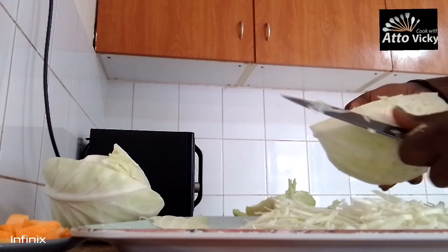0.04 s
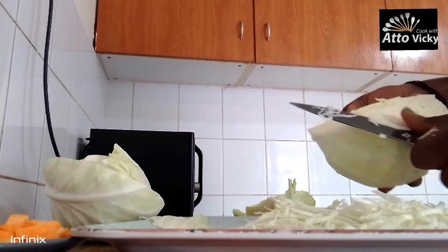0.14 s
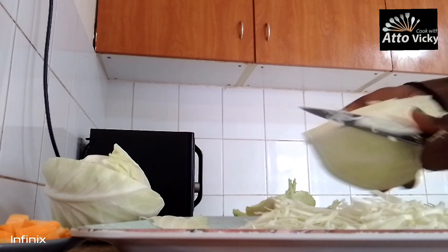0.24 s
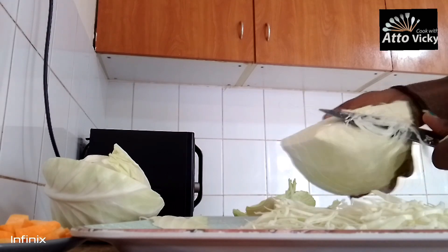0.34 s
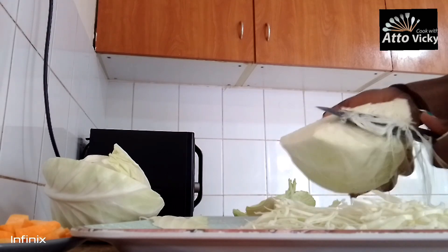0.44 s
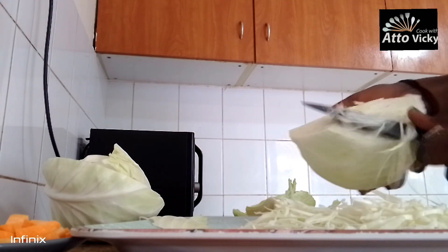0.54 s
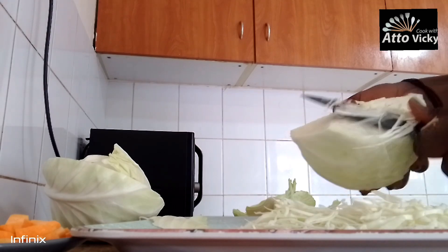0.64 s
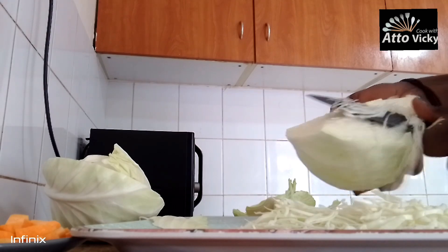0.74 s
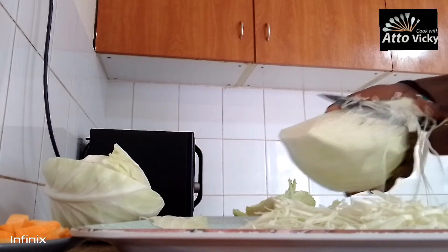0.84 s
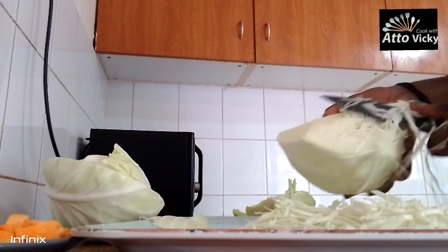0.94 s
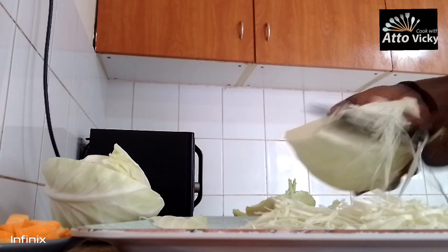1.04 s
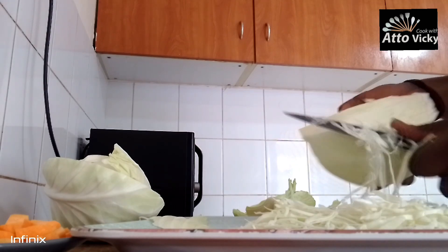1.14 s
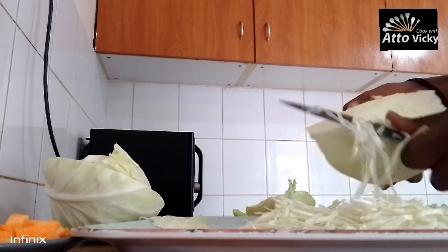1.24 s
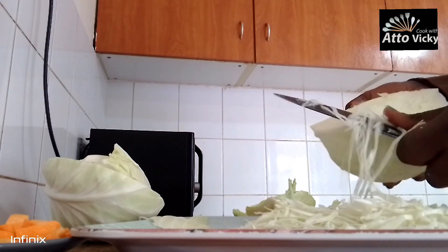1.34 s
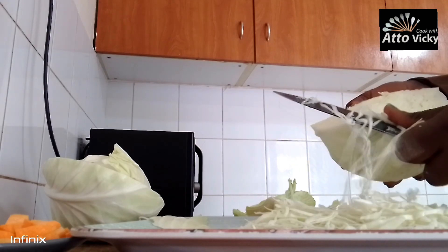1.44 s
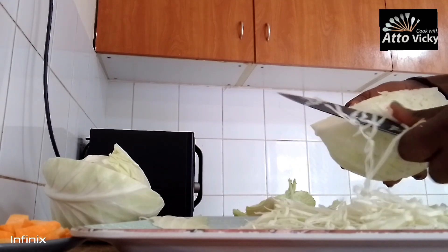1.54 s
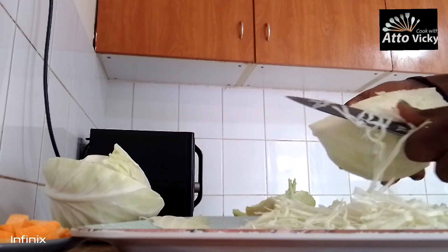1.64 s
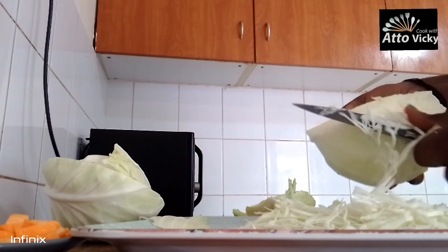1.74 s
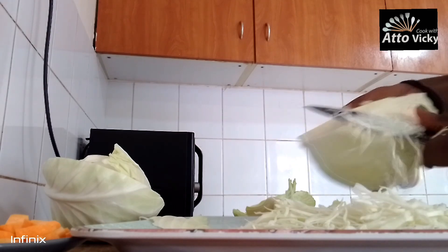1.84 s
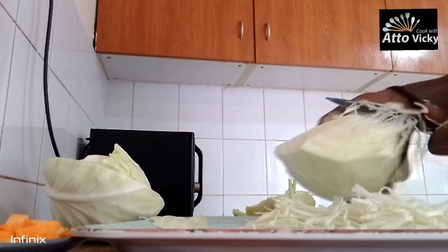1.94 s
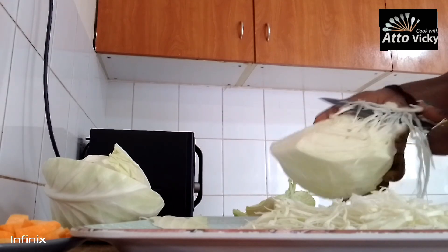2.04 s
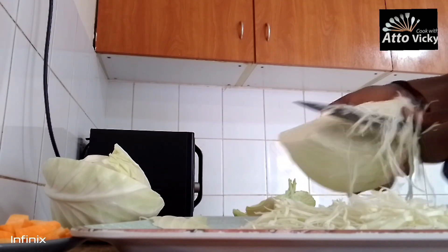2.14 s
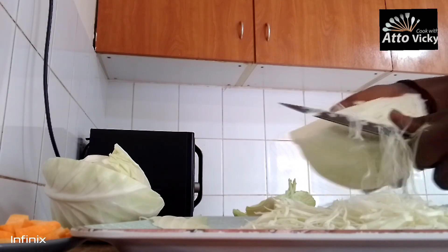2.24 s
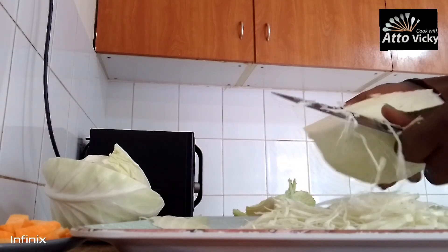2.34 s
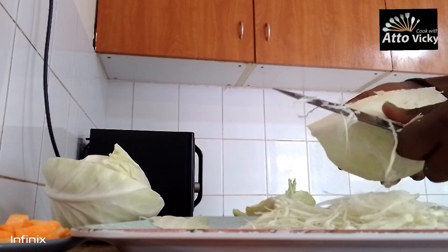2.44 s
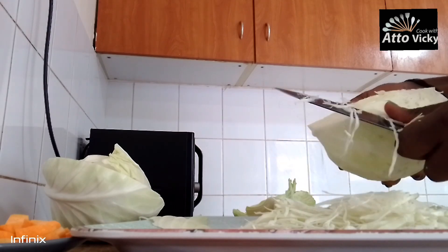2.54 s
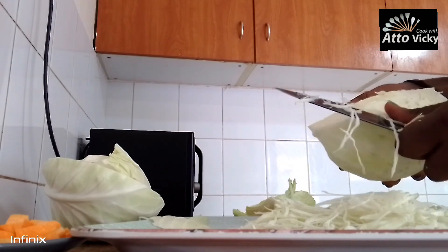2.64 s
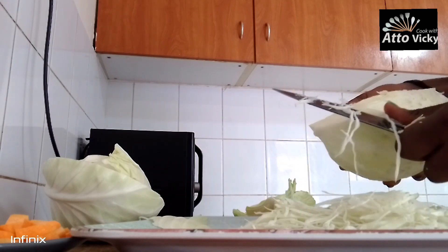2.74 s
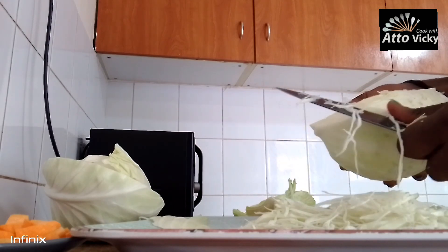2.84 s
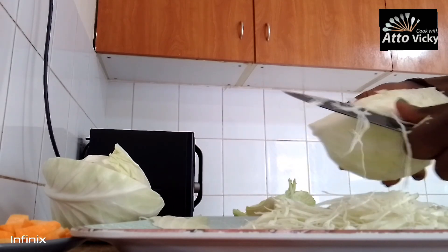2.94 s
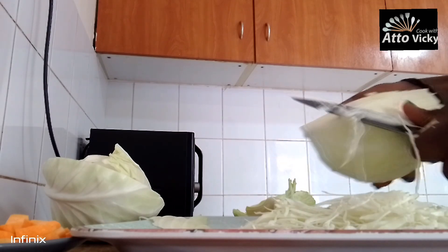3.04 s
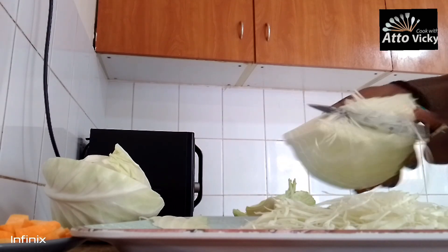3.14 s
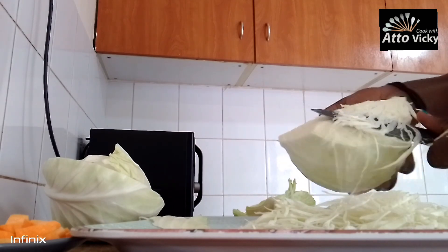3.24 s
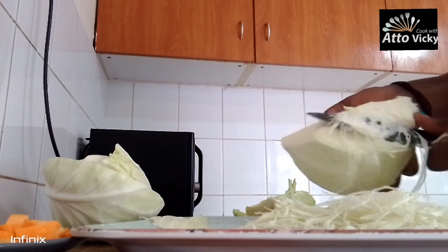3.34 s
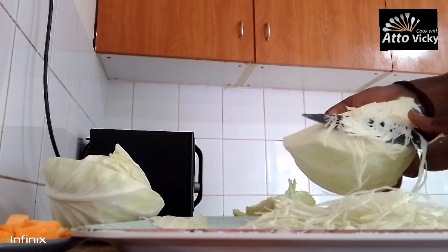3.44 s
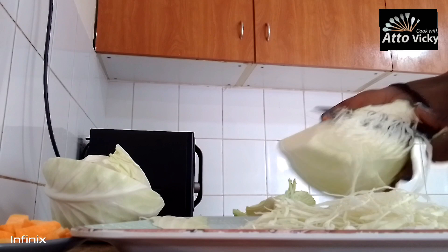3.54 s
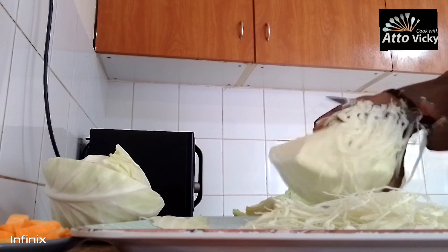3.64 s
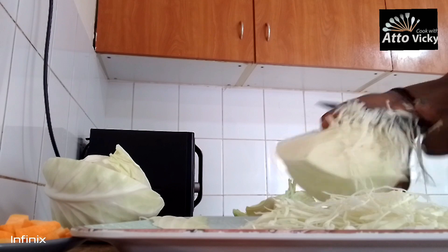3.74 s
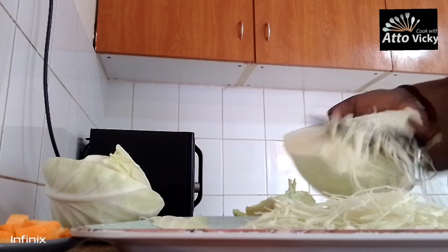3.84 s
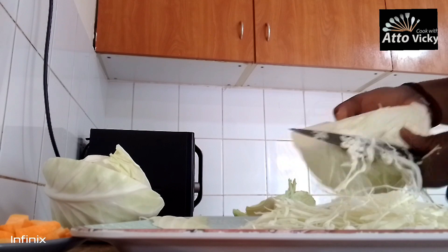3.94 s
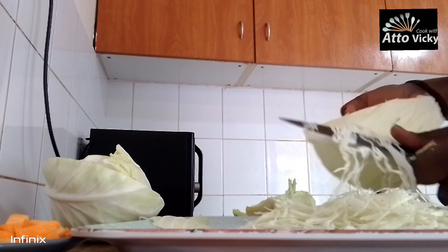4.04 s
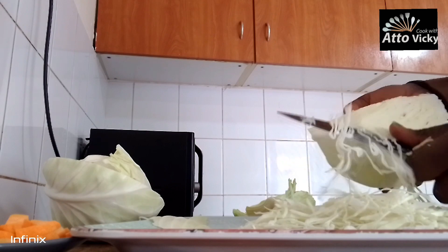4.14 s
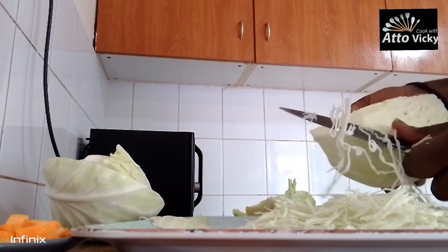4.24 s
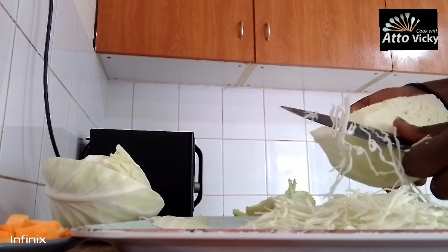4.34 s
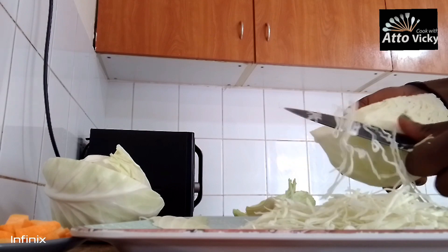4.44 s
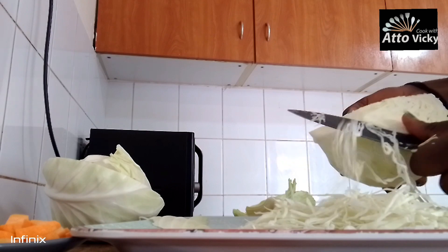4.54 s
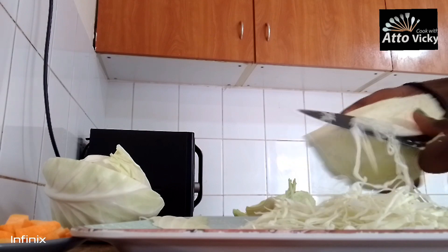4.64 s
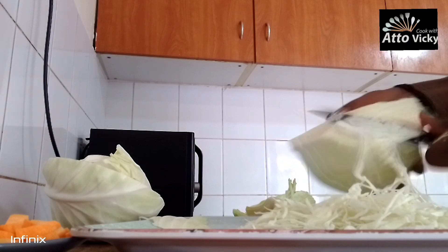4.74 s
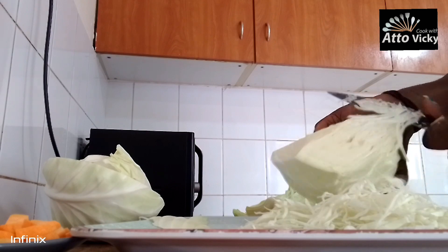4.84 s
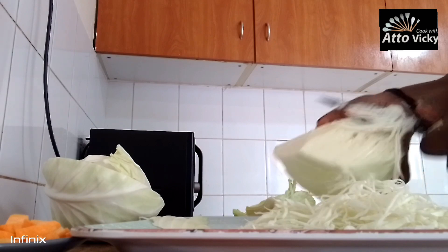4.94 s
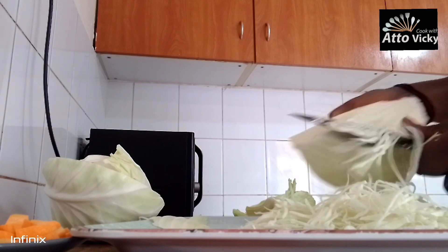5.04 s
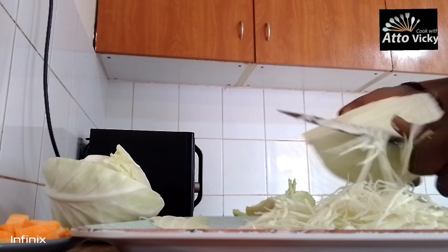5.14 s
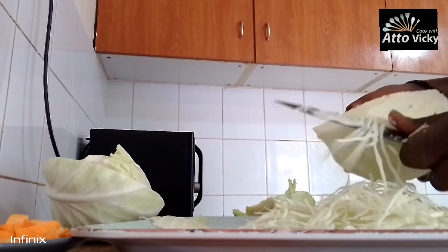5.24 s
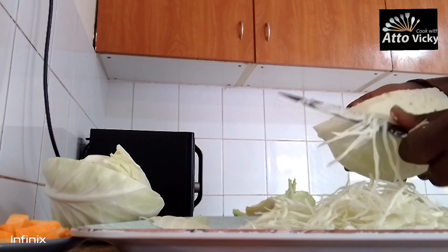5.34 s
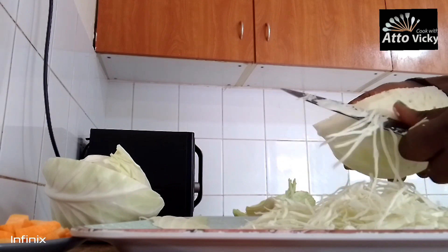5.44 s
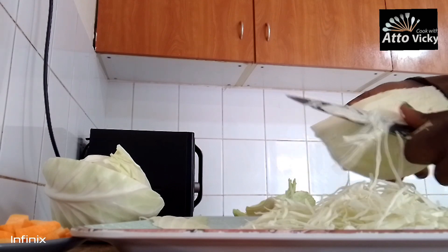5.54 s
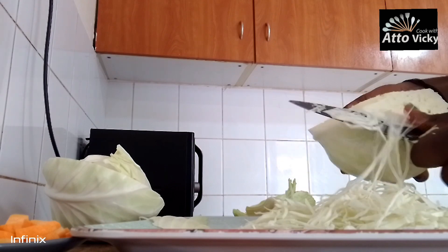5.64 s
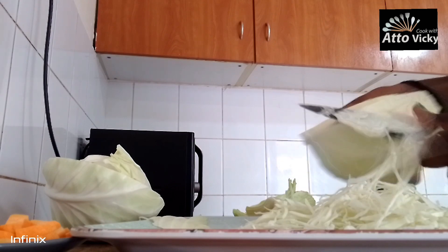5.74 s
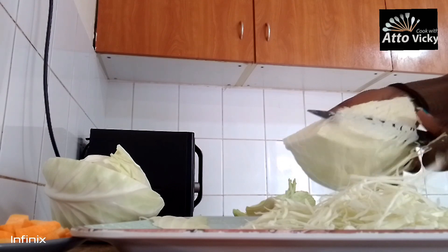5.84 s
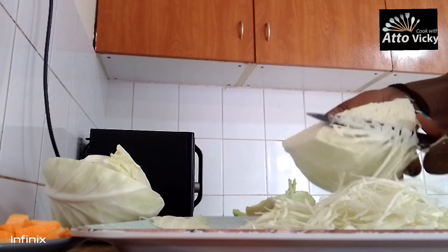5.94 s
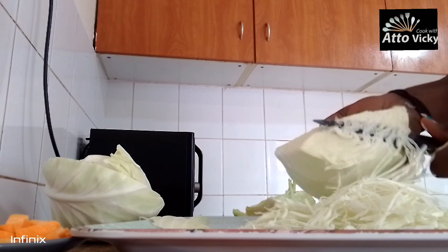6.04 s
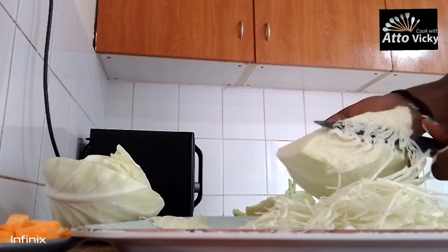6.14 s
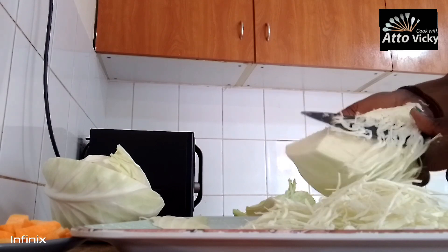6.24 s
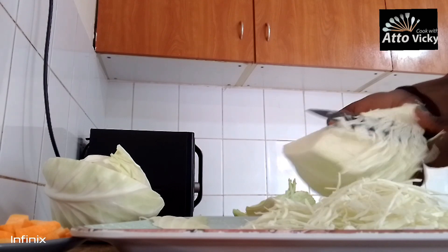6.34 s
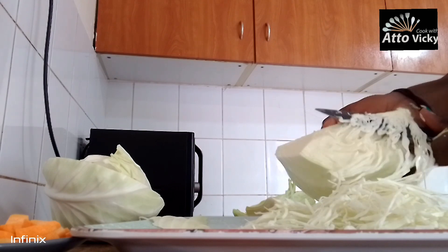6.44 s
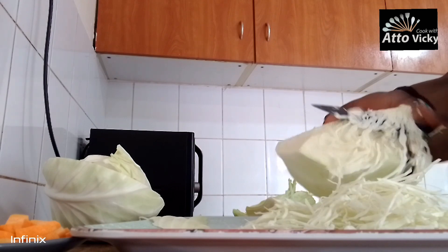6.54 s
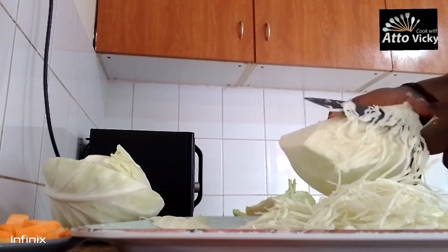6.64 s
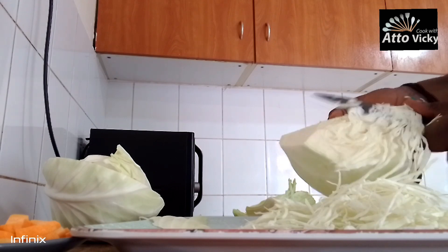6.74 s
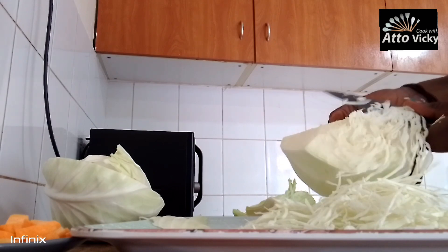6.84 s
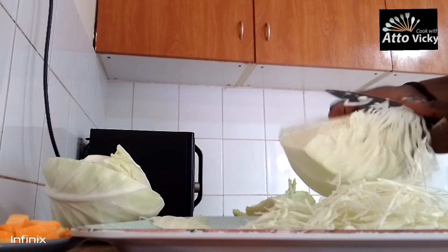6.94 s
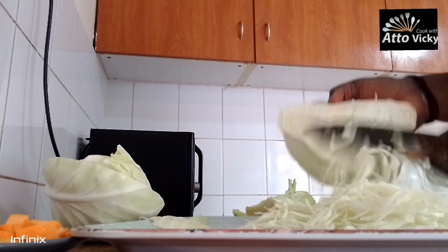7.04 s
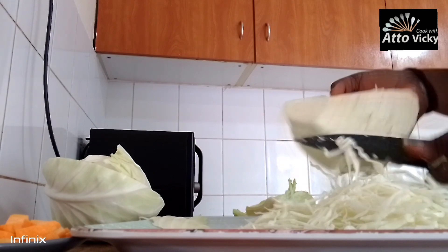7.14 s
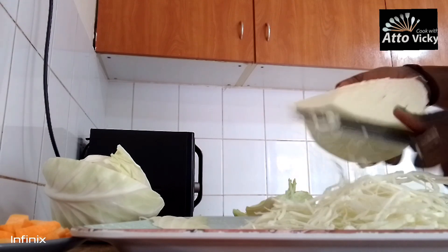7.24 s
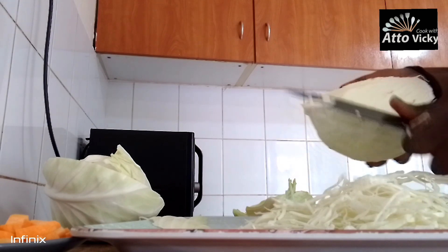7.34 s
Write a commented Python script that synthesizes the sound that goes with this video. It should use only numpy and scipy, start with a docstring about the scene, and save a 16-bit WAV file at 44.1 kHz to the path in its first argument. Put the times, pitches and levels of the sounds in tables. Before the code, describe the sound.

Raw cabbage is shredded by hand close to the microphone: brief tearing crunches with high sizzling edge noise and a slight hollow body. Early cuts are moderate, middle ones louder and more widely spaced, then a quick run of short cuts comes after about five and a half seconds. Tiny hard cracks, occasional wet squeaks and very soft pattering shreds add detail. A quiet appliance hum and a tiled room's short reverberation surround it.

```python
"""Tiled kitchen: a knife shreds a raw cabbage held in the hand.
Strokes are filtered random bursts: crisp cells, tearing fibres, edge fizz and the head's hollow body.
Ribs snap and shreds patter as decaying noise cracks; wet leaves squeak as narrow noise.
A soft hollow tone, also narrow noise, comes and goes. An appliance hums in sines over room noise.
Decaying noise and early reflections give the kitchen's echo."""
import sys
import numpy as np
from scipy import signal
from scipy.fft import rfft, irfft, next_fast_len
from scipy.io import wavfile
from scipy.ndimage import uniform_filter1d, map_coordinates

SR = 44100
rng = np.random.default_rng(int(sys.argv[2]) if len(sys.argv) > 2 else 0)


def pcm_store(signal):
    """Save signal as 16-bit PCM."""
    levels = np.round(np.clip(np.atleast_2d(signal), -1, 1) * 32767)
    wavfile.write(sys.argv[1], SR, levels.astype(np.int16).T)


N = 325458

# Appliance hum. Each row: frequency in Hz, rms level in dB before HUM_TRIM_DB.
HUM_PARTIALS = [(290.7, -77.5), (366.1, -85.5), (468.3, -87.5), (769.8, -99.5), (920.5, -89)]
# Room noise colour. Each row: frequency in Hz, relative density in dB per Hz.
AIR_COLOUR = [(25, -22), (120, -20.5), (160, -21.5), (200, -15), (245, 0), (330, -4.5), (650, -7),
              (900, -8), (1100, -12), (1800, -17), (2600, -22), (4500, -18.5), (8600, -14), (11500, -19.5),
              (15000, -16)]
HUM_TRIM_DB, AIR_RMS_DB = 2.0, -69.5

# Blade strokes, light grazes to full cuts. Each row: start in seconds, length in seconds,
# swell from entry to crest in dB (scaled per layer), then levels before layer trim of crunch in dB,
# tough fibres in dB, hollow body in dB, fine fizz in dB; body resonance at entry in Hz, at the end in Hz.
STROKES = [ (0.097, 0.091, 8, -50.5, -67.5, -68.5, -56.5, 720, 780),
           (0.296, 0.160, 13, -37, -51, -54.5, -48.5, 860, 740.5),
           (0.753, 0.076, 1, -58.5, -70, -65, -58.5, 560, 560),
           (0.847, 0.13, 14.5, -40.5, -55, -64, -55, 880, 990),
           (1.661, 0.16, 3, -49, -67.5, -61, -56.5, 720, 960),
           (1.887, 0.165, 11, -35, -46.5, -46.5, -44.5, 960, 523.5),
           (2.983, 0.028, 11, -59, -72, -69, -61.5, 650, 650),
           (3.055, 0.24, 18, -32.5, -48, -56, -50, 400, 682),
           (3.470, 0.046, 13, -58.5, -76, -71, -68, 520, 520.5),
           (3.62, 0.098, 16.5, -29.5, -45.5, -50, -47, 920, 924),
           (4.497, 0.034, 0, -61.5, -76, -75, -66, 800, 800),
           (4.557, 0.033, -2, -51, -67.5, -69, -55.5, 900, 860),
           (4.713, 0.14, 10, -29, -44.5, -43.5, -40, 740, 771),
           (5.594, 0.080, 3, -46, -65.5, -62.5, -55.5, 870, 900),
           (5.782, 0.15, 2, -32, -46.5, -49, -41.5, 680, 620.7),
           (6.068, 0.077, 7.5, -34, -52.5, -52, -51.5, 650, 680),
           (6.303, 0.0262, 10, -54.5, -68, -69, -60, 780, 830),
           (6.415, 0.089, 22, -31.5, -48.5, -54, -47.5, 1000, 1028),
           (6.650, 0.064, 9, -50.5, -73, -64, -62, 685, 685),
           (6.800, 0.018, -2, -51, -72, -71, -57, 685, 686.4),
           (6.82, 0.061, 6.5, -35.5, -52.5, -60.5, -48.5, 685, 681.5),
           (6.924, 0.099, 4, -47.5, -70.5, -69.5, -64, 680, 680),
           (7.205, 0.12, -3, -67.5, -74, -81, -86, 650, 540), ]
# Cut colours. Each row: frequency in Hz, relative density in dB per Hz.
CRUNCH_COLOUR = [(700, -44), (1500, -23), (2400, -33.5), (3800, -26), (5200, -12.5), (6500, -9.5),
                 (7800, 1), (8900, 3), (9900, -2.5), (11000, -9), (12500, -21.5), (16000, -33.5)]
FIBRE_COLOUR = [(900, -31), (1700, -6), (2600, 0.5), (3600, 1), (5200, 4), (7000, 1), (10000, -20)]
BODY_COLOUR = [(30, -15), (150, -58), (240, -19.5), (360, -7.5), (480, 0), (720, -0.5), (1250, 0),
               (1600, -14), (2500, -19.5), (4000, -12.5), (7000, -44)]
FIZZ_COLOUR = [(1200, -33.5), (2200, -14), (4000, -7), (7000, 0.5), (11000, 4), (12500, 4), (15700, 1)]
# How each layer follows a stroke. Entries: crest as a share of the length, share of the stroke's swell,
# swell of its own in dB, drop from crest to end in dB, fade after the end in dB/s.
CRUNCH_SHAPE = (0.7, 0.9, 1.2, 3.5, 270)
FIBRE_SHAPE = (0.92, 0.98, 6.7, 3.6, 320)
BODY_SHAPE = (0.79, 0.67, 5.8, 1.9, 185)
FIZZ_SHAPE = (0.51, 0.46, 0.87, 3.9, 480)
CRUNCH_TRIM_DB, FIBRE_TRIM_DB, BODY_TRIM_DB, FIZZ_TRIM_DB = -3.0, -2.5, -2.0, 2.3
BITE_S = 0.011  # rise as the edge enters, ending at the stroke's start

# Kitchen decay. Each row: frequency in Hz, time to fall 60 dB in seconds.
KITCHEN_DECAY = [(200, 0.93), (800, 0.58), (3000, 0.48), (8500, 0.37), (15000, 0.46)]
# Single ribs snapping. Each row: time in seconds, dry peak in dB.
RIB_SNAPS = [(0.3077, -35), (0.4205, -30), (1.6633, -32), (3.3884, -37), (3.6972, -22), (4.8122, -23),
             (5.5939, -39), (5.7845, -19.5), (5.8117, -18), (6.0716, -32), (6.3294, -39.5), (6.4448, -22),
             (6.4964, -28), (6.6747, -27.5), (6.826, -27), (6.859, -27), (6.9837, -30)]
# Loose shreds slipping off the blade and landing. Each row: time in seconds, dry peak in dB.
SHREDS = [(0.6749, -54), (1.1228, -56), (1.2064, -60), (1.2885, -58), (1.3174, -57), (1.6003, -54.5),
          (3.9894, -56), (6.2364, -48), (6.7464, -54)]
# Soft hollow tone. Each row: start (end of rise) in seconds, length in seconds, level at start in dB,
# first pitch in Hz, glide in Hz/s.
HOLLOW_TONES = [ (0.64, 0.2, -64.5, 432, 58), (2.06, 0.20, -61.5, 509.7, -250),
                (3.21, 0.07, -61, 440.3, 95), (3.395, 0.11, -68.5, 474, 13), (3.732, 0.096, -65, 429, -350),
                (5.09, 0.28, -57.5, 489.7, -240), (5.92, 0.10, -62, 560, -200), ]
HOLLOW_RISE_S, HOLLOW_FADE_DB_PER_S, HOLLOW_STOP_S = 0.089, 47, 0.057
# Wet leaves squeaking on the blade. Each row: start (end of rise) in seconds, length in seconds,
# pitch in Hz, nominal width in Hz, level in dB.
SQUEAKS = [(0.878, 0.067, 2850, 1506, -63.5), (1.76, 0.2, 1027, 170.3, -71.5),
           (3.055, 0.018, 1820, 300, -70), (3.15, 0.12, 4810, 600, -55), (4.75, 0.018, 1763, 199, -59),
           (6.486, 0.19, 1880, 171.6, -76.5), (6.52, 0.13, 4640, 454, -77),
           (6.89, 0.035, 5730, 1300, -53.5)]
# Resonances of the microphone's port and case. Each row: centre in Hz, half-width to 1/e of the dB gain
# in Hz, gain at centre in dB.
PORT_RESONANCES = [(1472, 104, -4.5), (1857, 68, 5.5), (4180, 80, -2), (4625, 230, 2.5), (13900, 500, 2.5)]
TOP_HZ = 15830  # band limit


def amp(db):
    """Decibels to gain."""
    return 10 ** (np.asarray(db) / 20)


def unit(x):
    """Scale to rms 1."""
    return x / np.sqrt(np.mean(x ** 2) + 1e-20)


def along(points, hz):
    """(Hz, value) points read on a log frequency axis."""
    point_hz, value = np.transpose(points)
    return np.interp(np.log(hz + 1), np.log(point_hz + 1), value)


def wobble(rate_hz):
    """Smooth random curve of rms 1, rate_hz knots a second."""
    knots = rng.standard_normal(int(N * rate_hz / SR) + 4)
    return unit(map_coordinates(knots, [np.arange(N) * rate_hz / SR]))


def click(colour, size=2048):
    """Minimum-phase pulse of this colour, energy 1."""
    cepstrum = irfft(np.log(amp(along(colour, np.fft.rfftfreq(size, 1 / SR)))))
    # fold onto positive time: causal
    cepstrum[1:size // 2] *= 2
    cepstrum[size // 2 + 1:] = 0
    pulse = irfft(np.exp(rfft(cepstrum)))
    return pulse / np.linalg.norm(pulse)


def coloured(x, colour):
    """x through a causal filter of this colour."""
    return signal.fftconvolve(x, click(colour))[:N]


def narrow_band(hz, width_hz):
    """Noise of rms 1 gathered around a steady or moving pitch."""
    flutter = wobble(width_hz) + 1j * wobble(width_hz)
    carrier = np.exp(2j * np.pi * np.cumsum(hz) / SR)
    return unit(np.real(flutter * carrier))


def gate(start_s, length_s, attack_s, release_s):
    """Linear rise ending at the start, hold for length_s, then linear fall."""
    t = np.arange(N) / SR - start_s
    return np.clip(1 + np.minimum(t / attack_s, (length_s - t) / release_s), 0, 1)


def background():
    """Appliance hum, unsteady in level and phase, over the room's noise."""
    t = np.arange(N) / SR
    hum = np.zeros(N)
    for hz, db in HUM_PARTIALS:
        level = amp(db + 0.48 * wobble(rate_hz=5.8))
        hum += level * np.sin(2 * np.pi * hz * t + 0.29 * wobble(rate_hz=6))
    air = coloured(rng.standard_normal(N), AIR_COLOUR)
    return np.sqrt(2) * amp(HUM_TRIM_DB) * hum + amp(AIR_RMS_DB) * air


def bursts(rate_hz, spread_db):
    """Cells bursting at random moments, rate_hz a second on average, in unequal sizes."""
    happens = rng.random(N) < rate_hz / SR
    sign = rng.choice([-1, 1], N)
    return happens * sign * amp(spread_db * np.clip(rng.standard_normal(N), -2, 2))


def shifting(x, depth_db, size=512):
    """Leaf resonances drift as the blade moves on: smooth gain patches in time and frequency; rms 1."""
    z = signal.stft(x, nperseg=size)[2]
    field = uniform_filter1d(rng.standard_normal(z.shape), size=4, axis=0)
    field = uniform_filter1d(field, size=18, axis=1)
    return unit(signal.istft(z * amp(depth_db * unit(field)), nperseg=size)[1][:N])


def pressure(shape, column):
    """Layer gain: the edge bites, the push builds to a crest and eases, then the cut dies away."""
    crest, follow, own_db, drop_db, fade_db_per_s = shape
    t, gain = np.arange(SR) / SR - BITE_S, np.zeros(N + SR)
    for row in STROKES:
        start_s, length_s, swell_db = row[:3]
        build_db = (own_db + follow * swell_db) * np.clip(1 - t / (crest * length_s), 0, 1) ** 2
        ease_db = drop_db * np.clip((t / length_s - crest) / (1 - crest), 0, 1) ** 2
        fade_db = fade_db_per_s * np.maximum(t - length_s, 0)
        bite = np.clip(1 + t / BITE_S, 0, 1)
        level = amp(row[column] - build_db - ease_db - fade_db)
        gain[round((start_s - BITE_S) * SR):][:SR] += bite * level
    return gain[:N]


def slice_pitch():
    """Slice resonance in Hz per sample, gliding evenly through and between strokes."""
    times_s, pitches_hz = [], []
    for start_s, length_s, *_, first_hz, last_hz in STROKES:
        times_s += [start_s, start_s + length_s]
        pitches_hz += [first_hz, last_hz]
    return np.interp(np.arange(N) / SR, times_s, pitches_hz)


def cutting():
    """Bursting cells: crisp crunch, tearing fibres, fine edge fizz and the head's hollow answer."""
    # leaf after leaf: bursts clump, alike in all layers
    leaves = unit(amp(1.13 * wobble(rate_hz=130)))
    cells = shifting(coloured(bursts(rate_hz=6500, spread_db=4.5), CRUNCH_COLOUR), depth_db=3.5)
    # few tough fibres: lower, sharper, more changeable resonances
    fibres = shifting(coloured(bursts(rate_hz=900, spread_db=3.5), FIBRE_COLOUR), depth_db=4.0, size=1024)
    fizz = unit(coloured(bursts(rate_hz=6000, spread_db=3.5), FIZZ_COLOUR))
    thud = shifting(coloured(bursts(rate_hz=1400, spread_db=2), BODY_COLOUR), depth_db=2.5, size=1024)
    # the slice under the blade rings at a moving pitch
    body = unit(thud + 0.97 * narrow_band(slice_pitch(), width_hz=240))
    return leaves * (amp(CRUNCH_TRIM_DB) * cells * pressure(CRUNCH_SHAPE, column=3)
                     + amp(FIBRE_TRIM_DB) * fibres * pressure(FIBRE_SHAPE, column=4)
                     + amp(BODY_TRIM_DB) * body * pressure(BODY_SHAPE, column=5)
                     + amp(FIZZ_TRIM_DB) * fizz * pressure(FIZZ_SHAPE, column=6))


def answer(count=5):
    """Echo from one hand position: near walls and board, then a tail decaying by frequency."""
    hz, t, z = signal.stft(rng.standard_normal(SR), SR, nperseg=256)
    decay = amp(-60 * t / along(KITCHEN_DECAY, hz)[:, None])
    tail = signal.istft(z * decay, SR, nperseg=256)[1]
    echo = amp(-7) * np.pad(tail / np.linalg.norm(tail), (round(.004 * SR), 0))
    reflections = (rng.uniform(.001, .007, count) * SR).astype(int)
    echo[reflections] += amp(-16.5) * rng.choice([-1, 1], count)
    return echo


def kitchen(x, count=16):
    """The hands keep moving: the echo crossfades through count positions."""
    place = np.linspace(0, count - 1, N)
    echo = np.zeros(N)
    for k in range(count):
        share = np.sqrt(np.clip(1 - abs(place - k), 0, 1))
        echo += signal.oaconvolve(x * share, answer())[:N]
    return echo


def crack(decay_s):
    """Fracture of peak 1: a sharp break, then splinters falling 60 dB in decay_s."""
    t = np.arange(SR // 10) / SR
    fracture = 0.4 * rng.standard_normal(len(t)) * amp(-60 * t / decay_s)
    fracture[0] = 1
    sound = np.convolve(fracture, click(CRUNCH_COLOUR) + 0.065 * click(FIZZ_COLOUR))
    return sound / np.abs(sound).max()


def snaps():
    """Ribs break short and hard; loose shreds patter longer and softer."""
    out = np.zeros(N + SR)
    for table, decay_s in ((RIB_SNAPS, .005), (SHREDS, .05)):
        for time_s, db in table:
            sound = amp(db) * crack(decay_s)
            out[round(time_s * SR):][:len(sound)] += sound
    return out[:N]


def hollow_tone():
    """Narrow, fluttering noise band that swells in softly, then glides and fades."""
    t, tone = np.arange(N) / SR, np.zeros(N)
    for start_s, length_s, db, hz, glide_hz_per_s in HOLLOW_TONES:
        age_s = np.clip(t - start_s, 0, length_s + HOLLOW_STOP_S)
        level = amp(db - HOLLOW_FADE_DB_PER_S * age_s)
        level = level * gate(start_s, length_s, HOLLOW_RISE_S, HOLLOW_STOP_S)
        tone += level * narrow_band(hz + glide_hz_per_s * age_s, width_hz=130)
    return tone


def squeaks():
    """A leaf sticks and slips on the steel: a rough, narrow noise note."""
    out = np.zeros(N)
    for start_s, length_s, hz, width_hz, db in SQUEAKS:
        note = narrow_band(np.full(N, hz), width_hz)
        out += amp(db) * note * gate(start_s, length_s, attack_s=0.005, release_s=0.033)
    return out


def scene():
    """Cabbage close by, its echo and the room."""
    near = cutting() + snaps() + squeaks() + hollow_tone()
    return (near + kitchen(near) + background())[None]


def record(dry):
    """Microphone port resonances colour the sound; nothing passes above the band limit."""
    size = next_fast_len(N + SR // 2)
    hz = np.fft.rfftfreq(size, 1 / SR)
    port_db = sum(db * np.exp(-((hz - centre_hz) / width_hz) ** 2)
                  for centre_hz, width_hz, db in PORT_RESONANCES)
    return irfft(rfft(dry, size) * amp(port_db) * (hz < TOP_HZ), size)[:, :N]


dry = scene()
out = record(dry)
pcm_store(out)
```